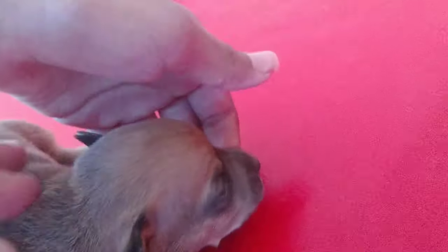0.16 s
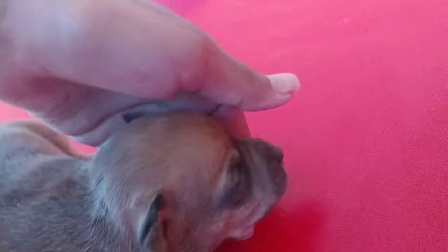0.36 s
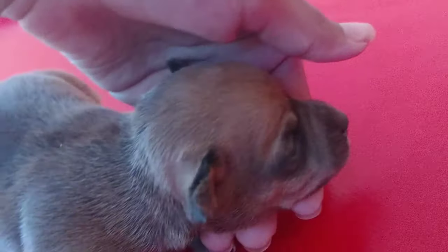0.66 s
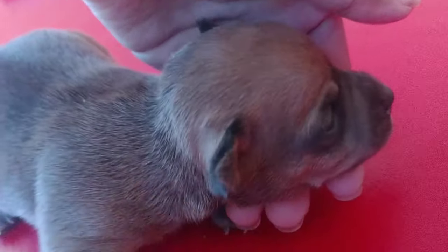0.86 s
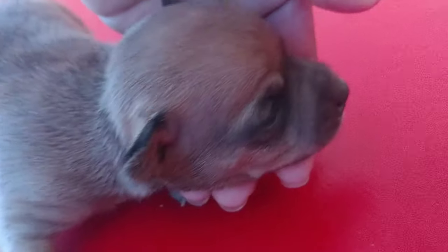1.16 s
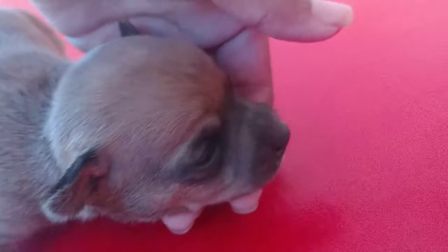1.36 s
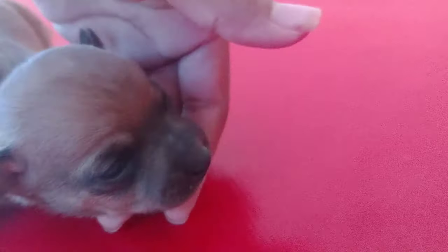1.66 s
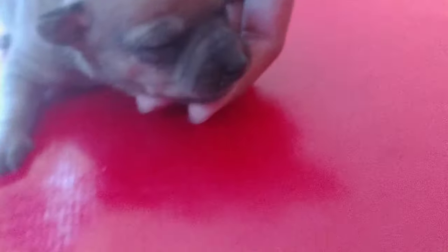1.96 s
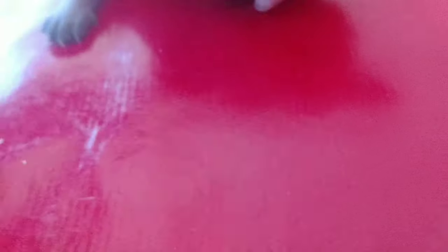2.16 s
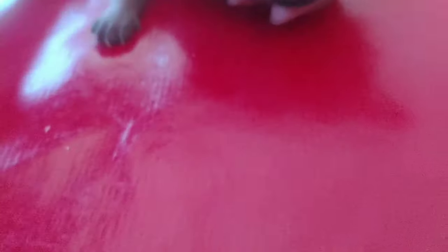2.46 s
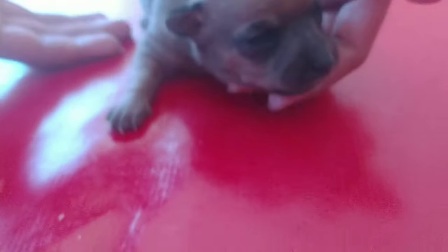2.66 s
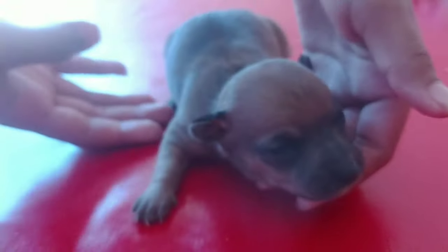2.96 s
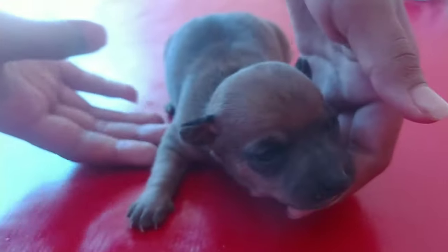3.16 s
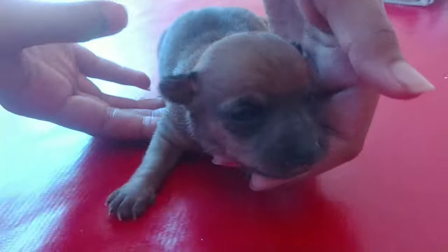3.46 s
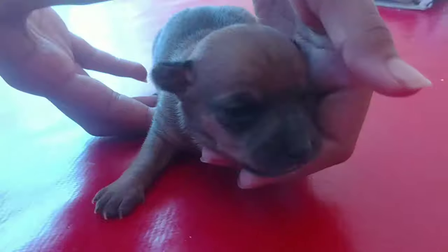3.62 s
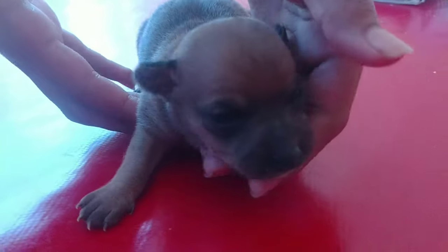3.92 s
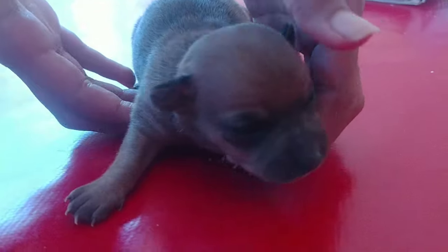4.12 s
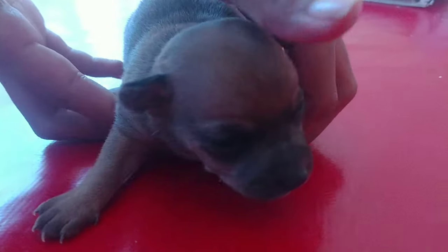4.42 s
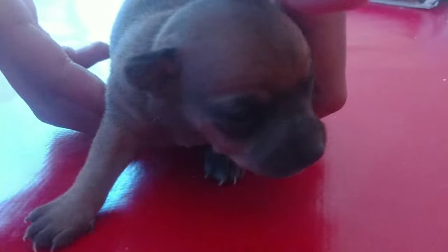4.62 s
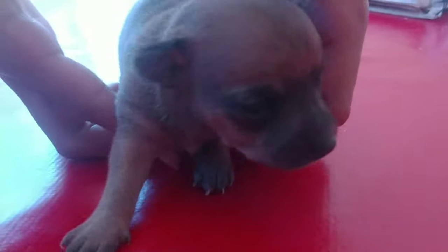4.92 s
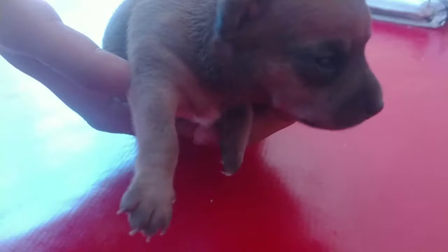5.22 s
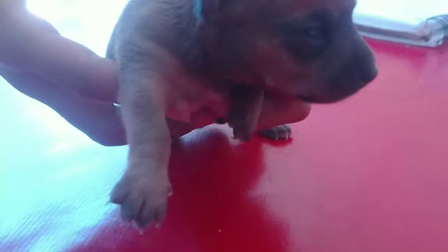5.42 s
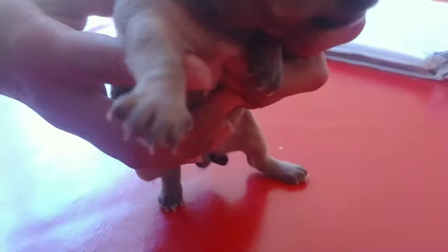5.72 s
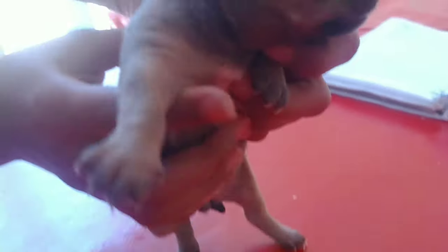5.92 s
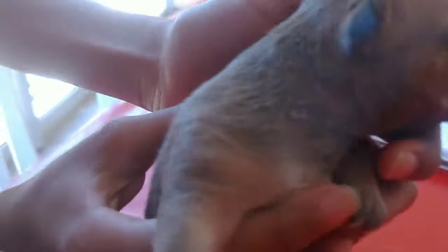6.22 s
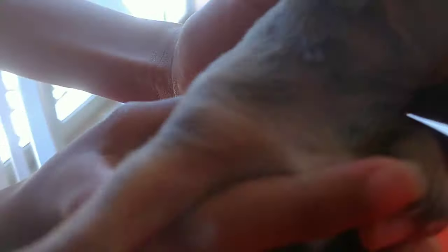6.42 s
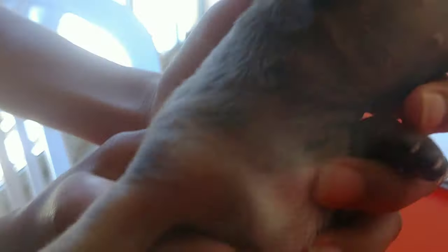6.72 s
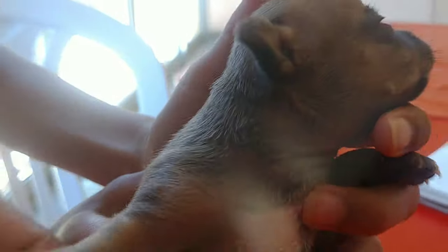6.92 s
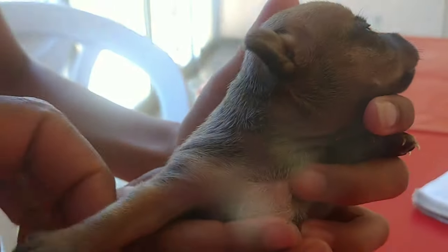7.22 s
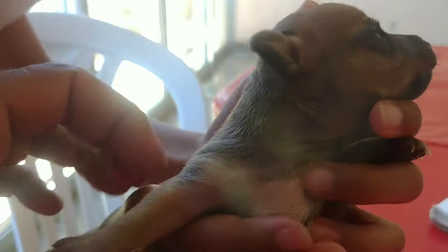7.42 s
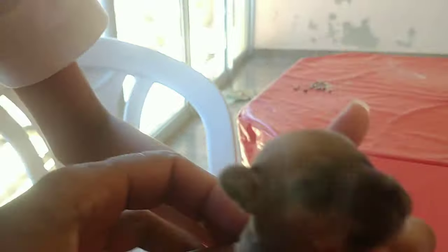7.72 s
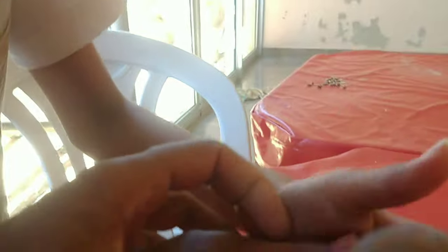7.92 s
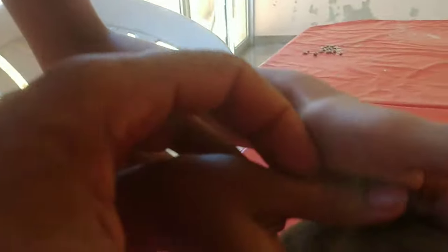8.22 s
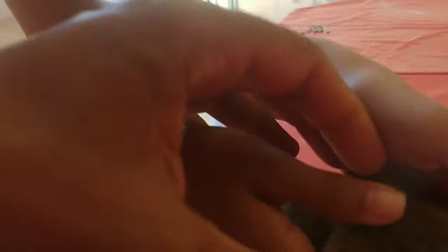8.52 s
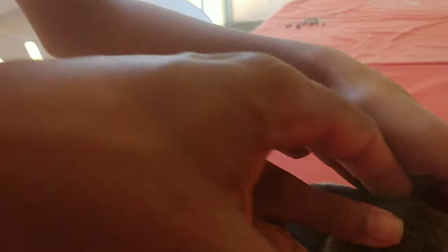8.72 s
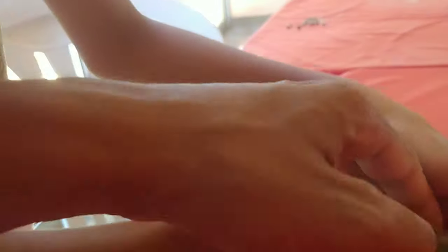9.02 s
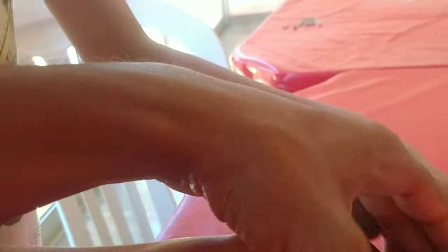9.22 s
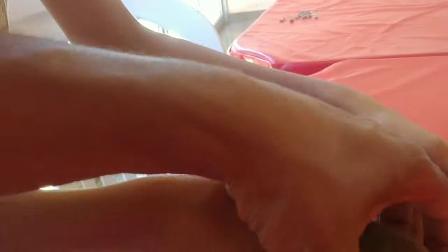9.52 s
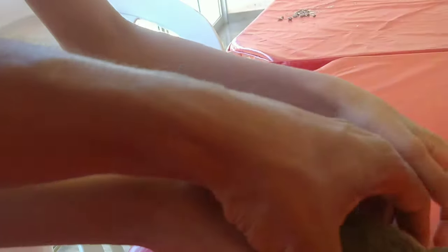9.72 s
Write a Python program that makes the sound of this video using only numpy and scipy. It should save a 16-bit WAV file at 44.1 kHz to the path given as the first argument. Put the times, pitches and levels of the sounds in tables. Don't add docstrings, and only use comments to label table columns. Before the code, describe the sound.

A very young puppy cries a hand's breadth from a phone microphone in a small, nearly dry room. A long fluttering wail comes first, then wavering moans and a yelp after a quarter second of total silence. Quick, soft, whistle-like whimpers follow at a steady pace, before longer, louder cries end the scene. A distant fan rumbles low, dipping under the loud cries.

```python
import sys
import numpy as np
from scipy import signal
from scipy.fft import rfft, irfft, next_fast_len
from scipy.io import wavfile
from scipy.ndimage import uniform_filter1d, map_coordinates

SR = 44100
rng = np.random.default_rng(int(sys.argv[2]) if len(sys.argv) > 2 else 0)


def generate_wav(sig):
    pcm = np.round(np.clip(np.atleast_2d(sig).T, -1, 1) * 32767).astype(np.int16)
    wavfile.write(sys.argv[1], SR, pcm)


def ratio_of_db(decibels):
    return 10 ** (np.asarray(decibels, float) / 20)


N = 435266


def catches_and_flips(t):
    # [t/s, swell/dB, pitch jump/share]
    catches = [(0.446, 1, 0.14), (0.489, 4.5, .15), (0.61, 2, .15), (.625, -8, .12), (0.636, 1, .12),
               (0.65, 3.5, 0.078), (0.665, 1.5, 0.12), (.678, 5, .14), (0.694, 7.5, 0.13), (.716, 6, .15),
               (0.742, 8.5, .15), (.788, 7, .15), (.815, 1, 0.16), (0.842, 0.5, 0.19), (0.871, -2.5, .14),
               (0.889, 4.5, 0.17), (9.582, -9, 0.13), (9.603, -12, 0.28), (9.62, -9, 0.16),
               (9.635, 1.5, 0.14), (9.651, -3, .15), (9.666, -4.5, 0.13), (9.688, -2, 0.17)]
    # [from/s, to/s, pitch factor, level/dB]
    flips = [
        (2.426, 2.438, 1.35, -9),
        (2.457, 2.476, 1.3, -4),
        (.408, .42, .92, -0.5),
        (5.095, 5.108, .93, 3.5),
        (5.155, 5.183, 0.99, -5.5),
        (5.429, 5.448, 1.07, -5.5),
        (8.493, 8.51, 1.06, 0.5),
    ]
    lift_db, bend, strain = np.zeros((3, N))
    for s, swell_db, jump in catches:
        near = slice(int((s - 0.03) * SR), int((s + 0.03) * SR))
        since = t[near] - s
        bump = np.exp(-0.5 * (since / 0.002) ** 2)
        undershoot = 0.4 * np.exp(-np.abs(since) / 0.008) * (since > 0.003)
        lift_db[near] += swell_db * bump
        bend[near] += jump * (bump - undershoot)
        strain[near] += np.exp(-0.5 * (since / 0.0035) ** 2)
    for start, end, factor, db in flips:
        flipped = (t > start) & (t < end)
        bend += (factor - 1) * flipped
        lift_db += db * flipped
    return lift_db, bend, strain


def cry_course():
    # [t/s, pitch f/Hz, fundamental/dB, second harmonic/dB, nasal treble/dB]
    wails = [
        [(0.0, 1469, -16.5, -31, -44), (0.004, 1475.0, -17, -33.0, -41.5), (0.212, 1434, -14.5, -41, -42.5),
         (0.224, 1502, -24.5, -43.5, -50), (0.23, 1196, -32.5, -56.5, -61)],
        [(0.386, 1148, -24.5, -37.5, -49), (0.392, 1254, -10, -25.5, -51), (0.416, 1134, -14.5, -21, -36.5),
         (0.426, 1262, -10, -13, -33.5), (0.434, 1479, -11, -31, -39.5), (0.472, 1601, -20, -32, -47.5),
         (0.546, 1496, -14.3, -36, -45), (0.62, 1530, -12, -38, -42.5), (0.676, 1583.0, -15, -39.5, -45),
         (0.682, 1583.0, -16, -38.5, -45.5), (0.762, 1540.0, -17, -36, -44), (0.912, 1499, -12, -44.5, -41.5),
         (0.982, 1475.0, -15.5, -44, -43.8), (0.996, 1511, -19.5, -52.5, -38), (1.004, 1714, -25, -24.5, -43),
         (1.014, 1658.0, -27.5, -31, -43.5)],
        [(1.194, 743.0, -40, -46.5, -59), (1.198, 676, -44.5, -32.5, -50), (1.234, 800.4, -33, -19, -41.5),
         (1.256, 1142, -21.5, -14, -44), (1.296, 1249.0, -23.5, -27, -45.2), (1.334, 1202, -29.5, -35, -50.5),
         (1.362, 1270.0, -21, -20.5, -34), (1.44, 1109.0, -23, -31, -50.5), (1.456, 1037, -16.5, -34, -54),
         (1.486, 765.6, -32, -37, -47), (1.548, 675, -40, -45, -55.5), (1.556, 603.0, -40, -49, -63)],
        [(1.726, 614.0, -40, -57, -66), (1.732, 560.5, -36, -32, -64.5), (1.75, 555, -36, -29.5, -71),
         (1.792, 765, -33.5, -40, -53.5), (1.848, 965.7, -18.5, -54, -54.5), (1.856, 975, -18, -55, -53.5),
         (1.86, 982, -28.0, -56.0, -44.5)],
        [(2.115, 1024, -23, -34, -45), (2.117, 1037, -18, -25, -54), (2.151, 1101, -21.5, -50, -60.4),
         (2.163, 1037, -34.6, -55, -58)],
        [(2.312, 522.7, -40, -22.5, -54.5), (2.338, 600.4, -38, -24, -44), (2.4, 861.5, -29.5, -27, -42),
         (2.422, 1101, -14, -16.5, -45), (2.448, 1065, -16.5, -27, -46.5), (2.498, 1149, -23.5, -39.5, -54.3),
         (2.53, 1055.0, -17.5, -43, -54), (2.562, 1023.0, -19.5, -37, -60), (2.63, 1012.0, -19, -44.3, -62.5),
         (2.708, 981.6, -22.5, -62, -65.5), (2.728, 1013, -29, -59, -70.5)],
        [(2.895, 530, -50, -62.9, -65), (2.901, 462.8, -39, -40.5, -73), (2.927, 488.4, -35, -28.5, -66),
         (2.991, 656, -37.5, -40.5, -49), (3.013, 766, -36, -36.5, -55), (3.025, 635.0, -51, -71.4, -66)],
    ]
    whimpers = [
        [(3.2, 861, -36, -61, -61), (3.206, 1051, -25.5, -40.4, -74), (3.232, 1132, -26.5, -39.5, -69),
         (3.272, 1338, -48, -61, -64.0), (3.308, 1280, -37, -57, -66), (3.32, 1070, -40, -59, -64.8)],
        [(3.532, 1256, -50.8, -81, -58), (3.554, 1468, -32, -52.5, -60), (3.584, 1622, -36, -54.8, -54),
         (3.694, 1629, -39, -61, -54.5), (3.722, 1491, -47, -69.1, -63)],
        [(3.926, 1103, -49.5, -60, -59.5), (3.948, 1129, -20.5, -38.5, -47.5), (3.95, 1563, -29, -44, -45.5),
         (3.968, 1718, -33, -60.5, -48.9), (4.108, 1871, -41.5, -61, -47), (4.156, 1789, -37, -67, -55.5)],
        [(4.334, 1233, -35, -64.4, -66), (4.35, 1245, -23.5, -45.5, -60), (4.364, 1432, -37, -50.1, -63.5),
         (4.386, 1803, -22.5, -48.5, -49), (4.53, 1805, -24.5, -54.3, -47.5), (4.552, 1761, -24.7, -50, -51.9),
         (4.566, 1208, -45, -72.5, -60)],
        [(4.736, 1212, -35.5, -65, -65.5), (4.79, 1726, -31.5, -47.3, -54.5), (4.878, 1740, -22.5, -48.5, -52),
         (4.886, 1740, -37.5, -48, -58), (4.898, 1263, -30, -78.2, -55.9), (4.906, 1267, -41, -74.3, -57)],
        [(5.07, 1131, -28, -55.1, -54), (5.08, 1202, -24, -49.5, -65), (5.11, 1082, -18.5, -28.5, -45.5),
         (5.192, 1482, -30.5, -51, -54), (5.204, 1026, -19.5, -46, -61.5), (5.21, 908, -34, -50, -62)],
        [(5.374, 1048, -37.0, -72, -58), (5.38, 1095, -25.5, -45, -64.4), (5.424, 1240, -21, -44, -58),
         (5.442, 1441, -30, -47, -48), (5.486, 1350, -37.5, -56, -65), (5.5, 1027, -20.5, -51, -64),
         (5.51, 975.7, -51, -65.2, -61.8)],
        [(5.705, 1008, -42, -72, -56), (5.711, 1033, -21.5, -44, -65.5), (5.753, 1221, -24.4, -49, -63),
         (5.767, 1355, -33, -54, -58.5), (5.821, 1324, -35, -62, -59.5), (5.829, 1225, -23, -62, -58),
         (5.839, 1006, -25.5, -57, -68), (5.847, 1107, -48, -69, -61)],
        [(6.05, 1217, -56.5, -72, -64.2), (6.056, 1255, -32.5, -46, -61), (6.074, 1372, -53.9, -54, -55.5),
         (6.11, 1475, -39, -47.7, -53), (6.154, 1409, -43, -52.3, -61.5), (6.164, 1076, -28.5, -53, -59.4),
         (6.176, 1073, -52, -69, -61)],
        [(6.394, 1169, -44.0, -68, -60), (6.4, 1217, -31, -42.5, -65), (6.462, 1410, -42.5, -52.5, -54),
         (6.502, 1338, -42.5, -47.6, -58.5), (6.522, 1107, -24.5, -46, -60), (6.538, 1098, -57, -75, -60.2)],
        [(6.746, 1087, -47, -66, -61), (6.756, 1121, -24.5, -39, -69), (6.814, 1335, -37, -50, -57.5),
         (6.84, 1272, -30.2, -37, -58.5), (6.868, 1269, -30.5, -47, -63), (6.878, 1050, -27, -56.7, -66),
         (6.89, 1075, -51, -70.0, -60.5)],
        [(7.097, 1177, -53.5, -76, -60), (7.103, 1195, -31, -43, -62), (7.143, 1648, -38.5, -52.5, -48.5),
         (7.291, 1691, -33.5, -63, -50.5), (7.299, 1653, -42, -51, -51), (7.315, 1120, -36, -63.5, -58)],
        [(7.506, 1200, -42.6, -62, -53.6), (7.51, 1199, -32, -39.5, -64.5), (7.536, 1686, -35, -57, -48),
         (7.562, 1819, -24.5, -58.5, -47.5), (7.652, 1784, -27.5, -52.5, -45.5),
         (7.694, 1859, -21.9, -52, -49.5), (7.722, 1814, -26, -59.1, -46), (7.728, 1671, -38.5, -65.5, -53.5)],
    ]
    howls = [
        [(7.916, 1181, -41, -64.5, -63), (7.934, 1116, -15.5, -28, -43.5), (7.946, 1407, -32.5, -45, -38.5),
         (7.952, 1877, -18.5, -40.3, -35), (7.976, 1951, -20, -45.5, -44), (8.018, 1988, -20, -52, -44.5),
         (8.074, 1842, -28.5, -48.5, -49.5), (8.102, 1637, -34.5, -57.5, -49.5),
         (8.118, 1011, -34.5, -61, -58.5)],
        [(8.289, 926.3, -29, -54, -55), (8.293, 855.4, -23, -39, -52), (8.315, 866.5, -27.5, -29.2, -41.5),
         (8.325, 980, -15, -23.5, -39), (8.335, 1232, -20, -23, -38.5), (8.351, 1363, -27.6, -38, -29),
         (8.381, 1464, -21, -38.5, -39.5), (8.423, 1464, -22, -44.7, -41), (8.439, 1501, -23, -51.1, -39.5),
         (8.447, 1730, -24, -50.8, -44), (8.499, 1411, -25.5, -57.6, -51.5), (8.527, 1288, -27, -47, -40),
         (8.571, 1200, -25, -37, -44.5), (8.583, 1402, -35.3, -50.5, -62.5), (8.589, 1018, -21.5, -48, -62),
         (8.593, 1007, -35.5, -49, -60)],
        [(8.754, 758, -32, -39.5, -52.5), (8.758, 640, -36.5, -27, -55), (8.792, 757, -30.6, -26.5, -43.5),
         (8.824, 1087, -14, -15, -47.5), (8.854, 1157, -24.5, -30, -45), (8.89, 1183, -24.5, -42, -50.5),
         (8.93, 1171, -29, -41.5, -51.7), (9.032, 1044, -15, -25, -51.5), (9.078, 926, -21, -39, -46),
         (9.1, 944, -17.5, -28, -50.5), (9.126, 966, -17.5, -38, -55), (9.158, 1101, -19, -43.5, -63),
         (9.166, 1216, -30, -60, -62), (9.172, 1061, -35, -60, -70)],
        [(9.32, 786, -31.5, -51.5, -57), (9.33, 698, -35, -31, -62), (9.376, 826, -27.5, -30.5, -44.5),
         (9.396, 1012, -16, -30, -52.5), (9.402, 1030, -14, -40.0, -52), (9.44, 1036, -15.5, -41, -59),
         (9.45, 1007, -17, -37.5, -55.5), (9.5, 1031, -12, -41.5, -55.5), (9.512, 1040, -17, -46, -56),
         (9.668, 1289, -19.5, -36.5, -51), (9.74, 1374, -23.5, -43, -55.5), (9.752, 1443, -29.5, -52, -66.5)],
    ]
    t = np.arange(N) / SR
    cries = wails + whimpers + howls
    rows = np.concatenate(cries)
    curves = [np.interp(t, rows[:, 0], column) for column in rows[:, 1:].T]

    fades = []
    for cry in cries:
        start, end = cry[0][0], cry[-1][0]
        fades.append(np.minimum(0, np.minimum(4500 * (t - start), 1800 * (end - t))))
    fade_db = np.max(fades, 0)

    edges = np.concatenate([[cry[0][0], cry[-1][0]] for cry in cries])
    inside = np.searchsorted(edges, t) % 2 == 1
    nearest = np.searchsorted((rows[1:, 0] + rows[:-1, 0]) / 2, t)
    curves = [np.where(inside, c, rows[nearest, k + 1]) for k, c in enumerate(curves)]
    pitch, *levels = curves

    lift_db, bend, strain = catches_and_flips(t)
    levels = [uniform_filter1d(level + lift_db, size=90) for level in levels]
    pitch = uniform_filter1d(pitch * (1 + bend), size=90)
    return pitch, levels, fade_db, strain


def folds(pitch, phase, first_db, second_db, treble_db):
    # [f/Hz, level/dB]
    throat = [(1500, -9.5), (2300, 1), (3000, -9.5), (3900, -10.5), (4600, -1.5), (5500, -13), (7500, -0.5),
              (9000, -5.5), (12000, -12), (15500, -16.5)]
    voice = ratio_of_db(first_db + 0.89 * wobble(41)) * np.sin(phase)
    voice += ratio_of_db(second_db + 1.5 * wobble(50)) * np.sin(2 * phase + 0.59)
    for k in range(3, 15):
        hz = k * pitch
        share = np.clip((hz - 2 * pitch) / np.maximum(4400 - 2 * pitch, 300), 0, 1)
        db = (1 - share) * second_db + share * (treble_db - 5)
        db = db + along(throat, hz) + 3 * wobble(14)
        voice += ratio_of_db(db) * np.sin(k * phase + rng.uniform(0, 2 * np.pi)) * (hz < 15500)
    return voice


def nasal_breath(phase):
    # [f/Hz, density/dB per Hz]
    breath = [(800, -27.5), (2500, -1.5), (4500, -23), (6000, -19), (7500, -1.5), (10000, -6.5),
              (12500, 2.5), (15000, -18), (16000, -39)]
    air = noise(lambda f: ratio_of_db(along(breath, f)))
    return patchy(air, depth_db=7) * (1 + 0.48 * np.sin(phase))


def catch_rasp(phase, first_db, strain):
    flutter = noise(lambda f: 1 / (1 + (f / 450) ** 4)) * strain
    return flutter * (ratio_of_db(first_db - 12) * np.sin(phase + 1) + ratio_of_db(first_db - 16.5) * np.sin(2 * phase))


def puppy():
    pitch, (first_db, second_db, treble_db), fade_db, strain = cry_course()
    slack = np.clip((1000 - pitch) / 400, 0, 1)
    pitch = pitch * (1 + 0.0078 * wobble(45) + (0.0028 + 0.022 * slack) * wobble(500))
    phase = 2 * np.pi * np.cumsum(pitch) / SR
    voice = folds(pitch, phase, first_db, second_db, treble_db)
    rasp = catch_rasp(phase, first_db, strain)
    breath_level = ratio_of_db(treble_db - 5 + 0.12 * fade_db)
    return ratio_of_db(fade_db) * (np.sqrt(2) * voice + rasp) + breath_level * nasal_breath(phase)


def room(x):
    t = np.arange(SR // 5) / SR
    tail = rng.standard_normal(len(t)) * ratio_of_db(-60 * t / 0.06) * (t > 0.002)
    return signal.fftconvolve(x, tail / np.linalg.norm(tail))[:N]


def fan():
    # [f/Hz, density/dB per Hz]
    room_tone = [(12, -46), (20, -17), (110, -5), (146, -7), (177, -11), (198, -15.5), (310, -26),
                 (499, -29), (759, -33), (976, -36.5), (1660, -41), (2460, -48.5), (8180, -57),
                 (14700, -65), (16000, -78)]
    # [f/Hz, level/dB, width/Hz]
    hum_lines = [(50, -52, 6.5), (109, -48, 8), (170.8, -49, 2.4)]
    sound = ratio_of_db(-43.5 + 0.76 * wobble(9.3)) * noise(lambda f: ratio_of_db(along(room_tone, f)))
    for hz, db, width in hum_lines:
        sound = sound + ratio_of_db(db) * noise(lambda f: 1 / (1 + ((f - hz) / width) ** 2))
    return sound


def along(points, hz):
    f, v = np.transpose(points)
    return np.interp(np.log(hz + 1), np.log(f + 1), v)


def unit(x):
    return x / np.sqrt(np.mean(x ** 2) + 1e-20)


def noise(gain):
    m = next_fast_len(N)
    spectrum = rfft(rng.standard_normal(m)) * gain(np.fft.rfftfreq(m, 1 / SR))
    return unit(irfft(spectrum, m)[:N])


def wobble(rate):
    knots = rng.standard_normal(int(N * rate / SR) + 4)
    return map_coordinates(knots, [np.arange(N) * rate / SR])


def patchy(x, depth_db):
    z = signal.stft(x, nperseg=256)[2]
    field = uniform_filter1d(rng.standard_normal(z.shape), size=3, axis=0)
    field = uniform_filter1d(field, size=30, axis=1)
    return unit(signal.istft(z * ratio_of_db(depth_db * unit(field)), nperseg=256)[1][:N])


def scene():
    cry = puppy()
    power = uniform_filter1d(np.pad(cry, (0, 3000))[:N] ** 2, size=12000)
    loud = np.sqrt(np.abs(power))
    duck = 1 / (1 + (loud / ratio_of_db(-15.5)) ** 1.8)
    return (cry + ratio_of_db(-13) * room(cry) + duck * fan())[None]


def low_pass(x):
    return signal.sosfilt(signal.butter(12, 16490, fs=SR, output="sos"), x)


def record(dry):
    # [from/s, to/s]
    dropout = (1.862, 2.115)
    t = np.arange(N) / SR
    heard = (t < dropout[0]) | (t > dropout[1])
    return low_pass(dry * heard)


dry = scene()
out = record(dry)
generate_wav(out)
```